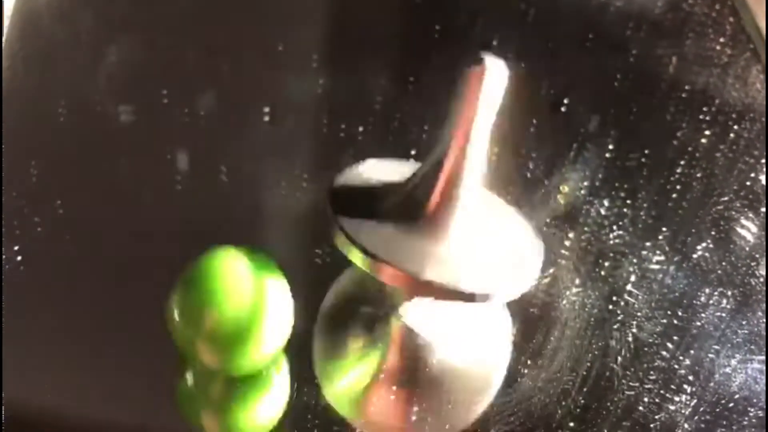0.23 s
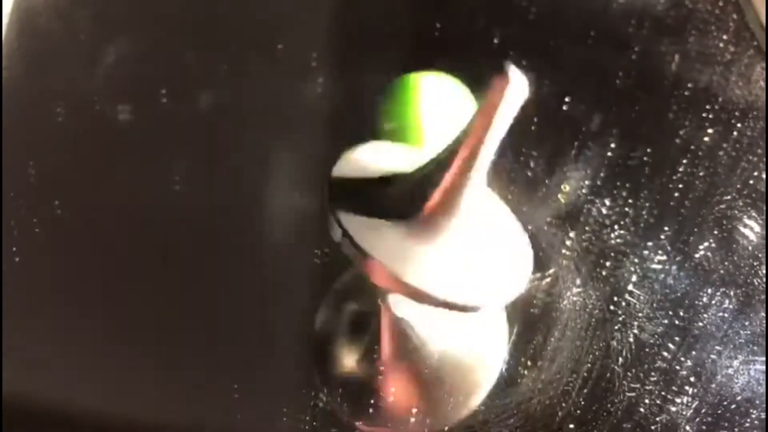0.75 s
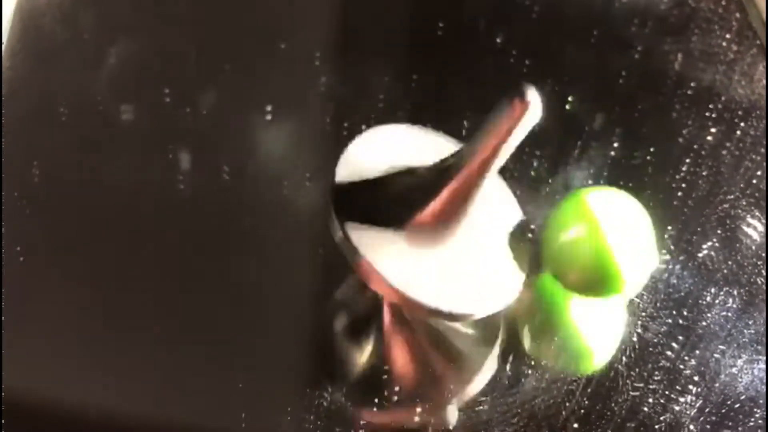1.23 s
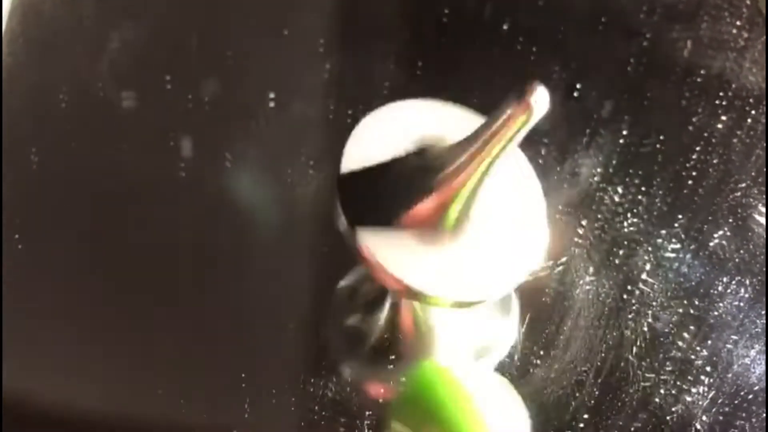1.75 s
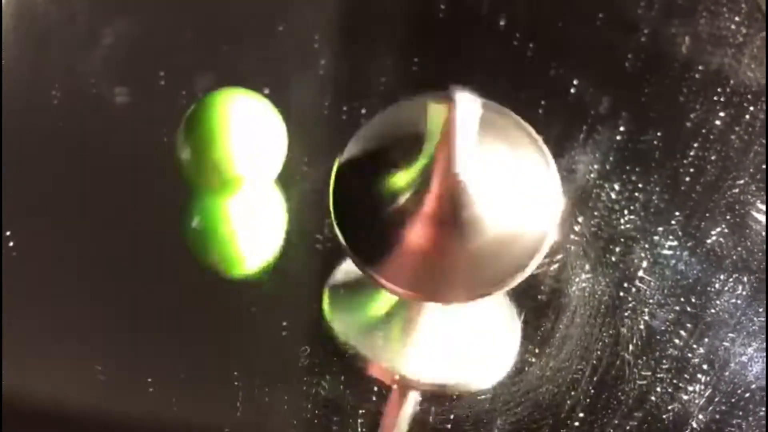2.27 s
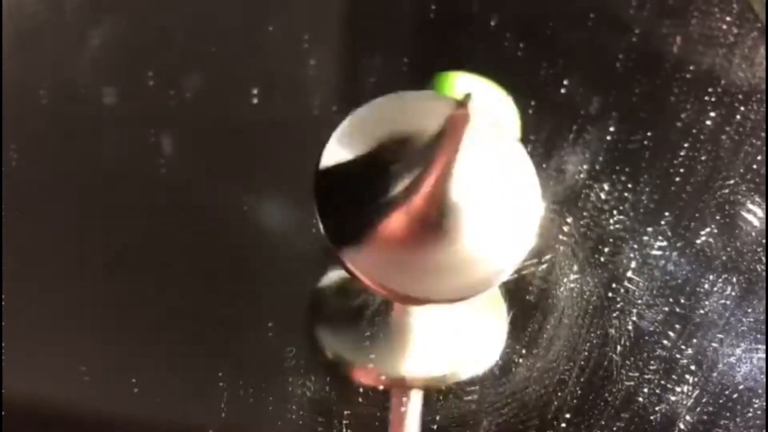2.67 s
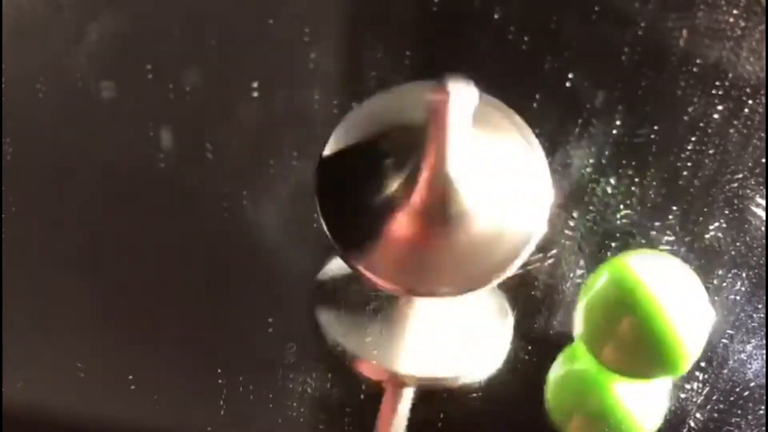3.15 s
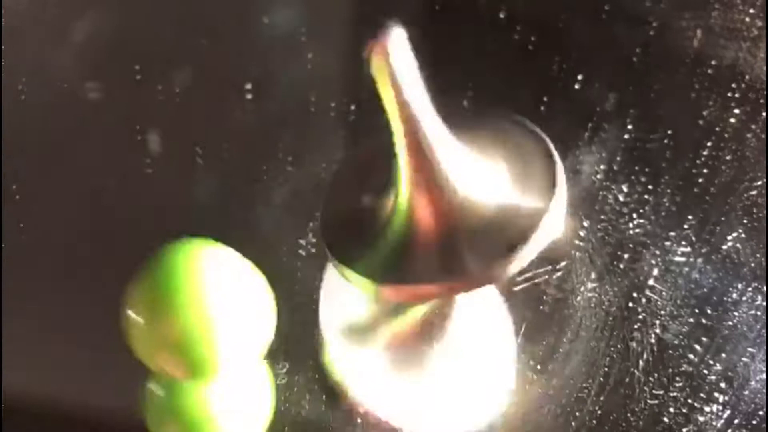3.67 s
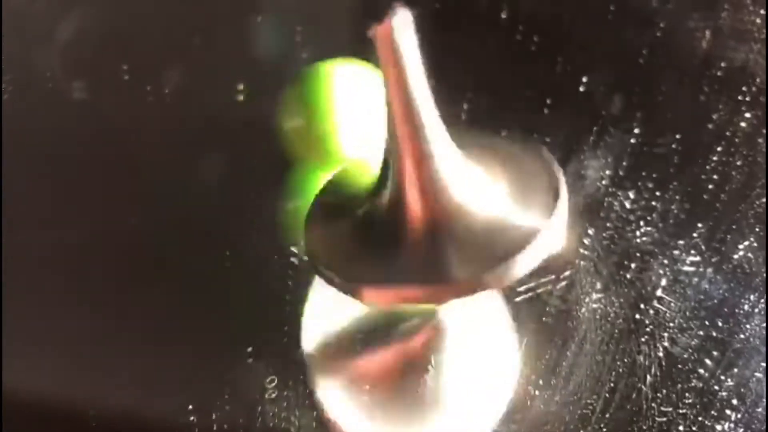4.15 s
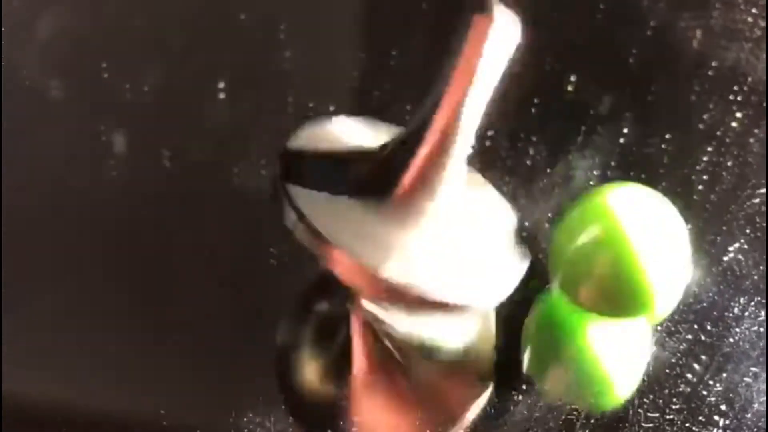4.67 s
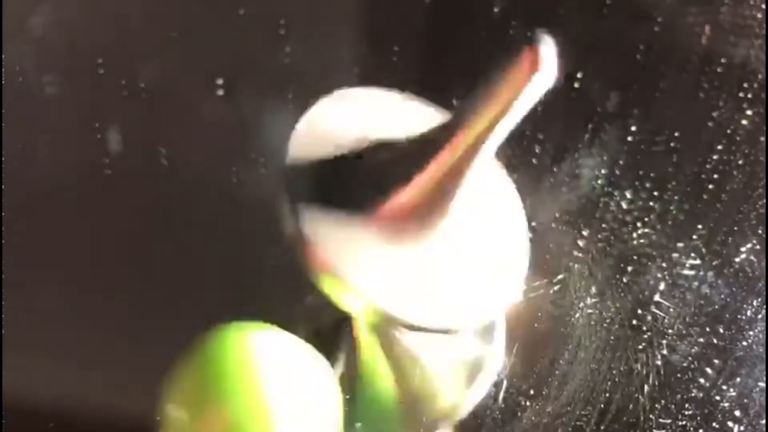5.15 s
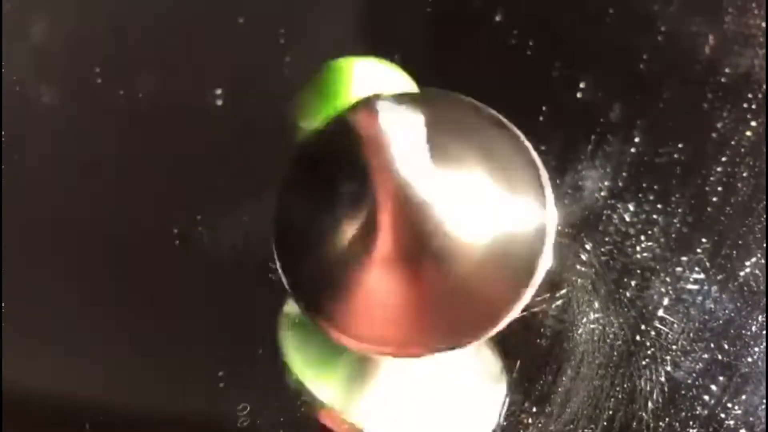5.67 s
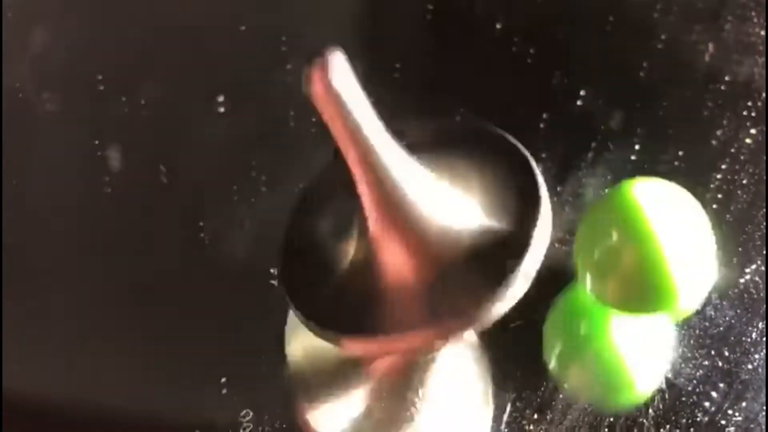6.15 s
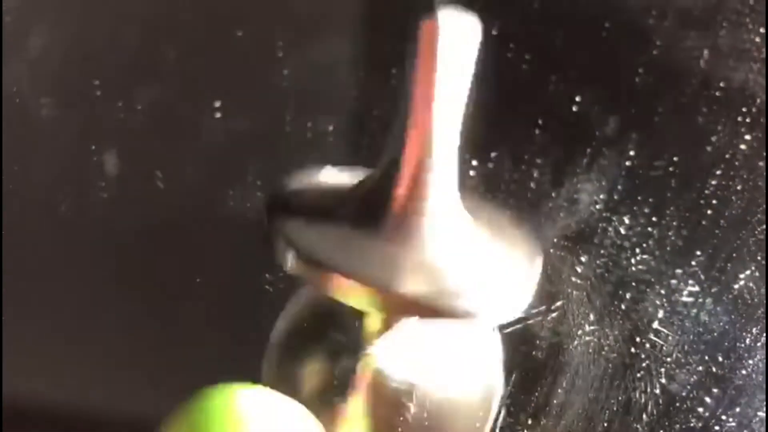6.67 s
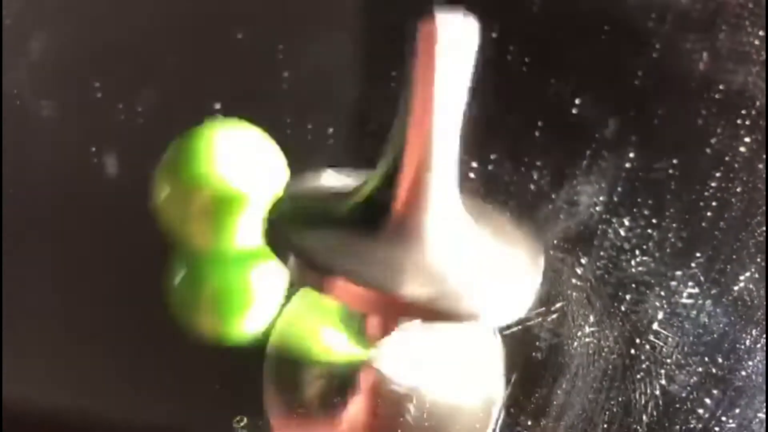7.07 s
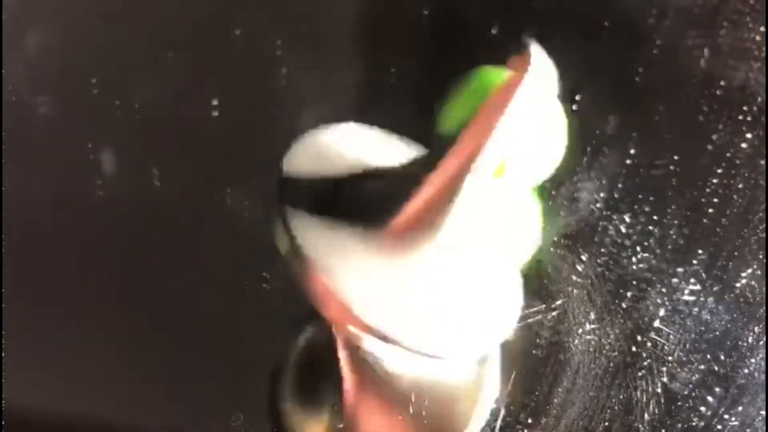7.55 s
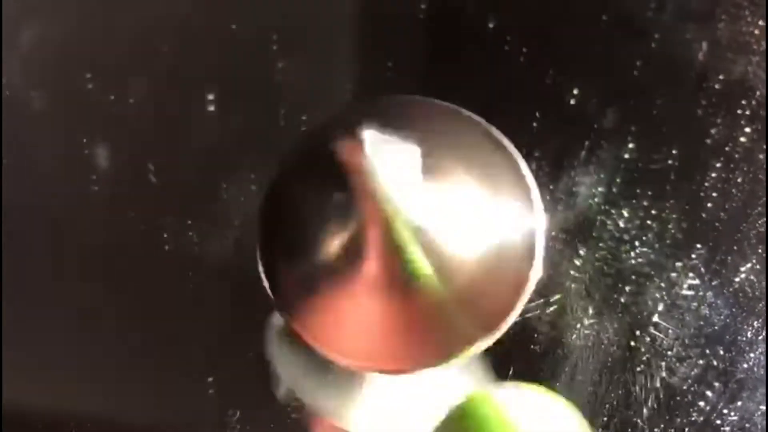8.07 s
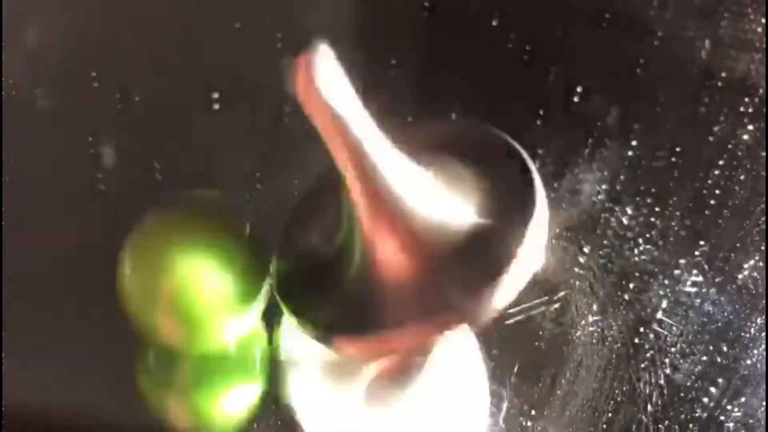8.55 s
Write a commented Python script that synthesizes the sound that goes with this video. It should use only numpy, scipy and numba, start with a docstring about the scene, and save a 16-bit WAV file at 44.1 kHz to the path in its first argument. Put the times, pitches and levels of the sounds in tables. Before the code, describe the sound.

Close, dry sound in a quiet small room: a steel top spins on a mirror with a steady mid-pitched hum and singing tone, fluttering about twenty times a second. A glass marble circles it, rolling, chattering and giving sharp irregular clicks. The pure tone thins midway, and rapid bumps of the leaning tip grow into a hard rattle by the end.

```python
"""A steel top spins on a mirror while a glass marble circles it, heard close up.
From the start the rough tip repeats almost the same pattern every turn, so the mirror hums and sings;
the marble rolls, chatters and clicks on the steel, and three jolts unsettle the pattern by 3.5 s.
Then the pure tone thins out while the top slows and leans further, and its flaw bumps the glass
once a turn, faintly at first and strongest near the end."""
import sys
import numpy as np
from scipy import signal
from scipy.fft import rfft, irfft
from scipy.io import wavfile
from scipy.ndimage import uniform_filter1d, map_coordinates
from numba import njit

SR = 44100
rng = np.random.default_rng(int(sys.argv[2]) if len(sys.argv) > 2 else 0)


def wav_out(sig):
    """Save sig, one row per channel (or a flat mono array), as 16-bit PCM at SR to the path in sys.argv[1]."""
    wavfile.write(sys.argv[1], SR, np.round(np.clip(np.atleast_2d(sig).T, -1, 1) * 32767).astype(np.int16))


N = 388962
TIME = np.arange(N) / SR


def undb(db):
    """Decibels to gain."""
    return 10 ** (np.asarray(db) / 20)


def unit(x):
    """Scale to rms 1."""
    return x / np.sqrt(np.mean(x ** 2))


def curves(table):
    """Draw each column of a table as an automation curve, one value per sample."""
    s, *columns = np.transpose(table)
    return [np.interp(TIME, s, column) for column in columns]


def swell(at_s, width_s):
    """A smooth rise and fall, 1 at its middle."""
    return np.exp(-.5 * ((TIME - at_s) / width_s) ** 2)


def walk(rate):
    """Slow random wander through `rate` knots per second, spread near 1."""
    knots = rng.standard_normal(int(N / SR * rate) + 2)
    return map_coordinates(knots, [TIME * rate], order=3, mode="nearest")


def fade(t, t60):
    """Exponential decay by 60 dB in t60 seconds."""
    return np.exp(-np.log(1000) * t / t60)


def colour(x, points, size=4096):
    """Causal minimum-phase EQ through (Hz, dB) points, scaled to unit power gain on white noise."""
    hz, db = np.transpose(points)
    log_hz = np.log(np.fft.rfftfreq(size, 1 / SR) + 1)
    log_gain = np.log(undb(np.interp(log_hz, np.log(hz), db)))
    # folding the cepstrum forward makes the response causal
    cepstrum = irfft(log_gain)
    cepstrum[1:size // 2] *= 2
    cepstrum[size // 2 + 1:] = 0
    response = irfft(np.exp(rfft(cepstrum)))
    return signal.fftconvolve(x, response / np.linalg.norm(response))[:len(x)]


def resonance(x, hz, width_hz):
    """One resonance, gain 1 at its centre."""
    return signal.lfilter(*signal.iirpeak(hz, hz / width_hz, fs=SR), x)


@njit
def moving_resonance(x, hz, width_hz):
    """State-variable band-pass whose centre may move, gain 1 at the centre."""
    y, band, low = np.empty(len(x)), 0., 0.
    for i in range(len(x)):
        g, k = np.tan(np.pi * hz[i] / SR), width_hz / hz[i]
        v = (band + g * (x[i] - low)) / (1 + g * (g + k))
        band, low, y[i] = 2 * v - band, low + 2 * g * v, k * v
    return y


def grit(per_s, spread_db):
    """Tiny contacts at random moments, a few much harder than the rest."""
    hardness = np.minimum(rng.exponential(size=N), 4)
    contacts = rng.random(N) < per_s / SR
    return unit(contacts * rng.standard_normal(N) * undb(spread_db * hardness))


# colour of the quiet room: (frequency [Hz], relative level [dB])
AIR_COLOUR = [(20, -35), (35, -8), (48, 2), (75, -5.5), (160, -8.5), (400, -11.5), (1000, -5.5),
              (4000, -17.5), (12000, -61)]
AIR_DB = -56.5


def room_tone():
    """Steady coloured noise: the air of the quiet room."""
    return undb(AIR_DB) * colour(rng.standard_normal(N), AIR_COLOUR)


def room(x, wet_db=-17, t60=0.066, size=12000):
    """Faint, dull reflections of a small room: a decaying noise tail after a 12 ms gap."""
    t = np.arange(size) / SR
    tail = colour(rng.standard_normal(size) * fade(t, t60) * (t > .012), [(3000, -12.0), (10000, -11.5)])
    return x + undb(wet_db) * signal.fftconvolve(x, tail / np.linalg.norm(tail))[:N]


# passages of the marble behind the top: (time [s], sag of the ring [Hz])
BEHIND = [(.76, 530), (2.7, 493), (4.25, 314), (5.82, 278), (7.28, 280)]
RING_HZ, BEHIND_WIDTH_S = 3276, 0.3


def ring_hz():
    """Pitch of the marble's ring, sinking each time it passes behind the top."""
    return RING_HZ - sum(sag_hz * swell(s, BEHIND_WIDTH_S) for s, sag_hz in BEHIND)


def glance(x, share=0.11, cycles=4.47):
    """A contact sound minus a near reflection, whose delay follows the pitch of the marble's ring."""
    lag = cycles * SR / ring_hz()
    return x - share * map_coordinates(x, [np.arange(N) - lag], order=3)


# rubs, as the low side of the rim catches the marble: (time [s], level [dB], half length [s])
RUBS = [(0.123, -49.5, 0.23), (0.744, -47.5, 0.29), (1.54, -43.5, 0.18), (1.966, -41, 0.089),
        (2.753, -42, 0.14), (3.33, -43, 0.076), (3.442, -35.5, 0.022), (3.753, -40.5, 0.041),
        (4.272, -40, 0.17), (4.567, -39, 0.056), (4.947, -34, 0.087), (5.202, -37, 0.041),
        (5.774, -39.5, 0.2), (6.23, -38.5, 0.04), (6.402, -32, 0.047), (6.637, -39.5, 0.084),
        (7.144, -40, 0.14), (7.988, -37, 0.31), (8.416, -48, 0.13)]
ROLL_DB = -68


def roll_gain():
    """Strength of the marble's contact: steady rolling plus the rubs of the rim, summed as power."""
    rub_power = sum(undb(db) ** 2 * swell(s, width_s) for s, db, width_s in RUBS)
    return np.sqrt(undb(ROLL_DB) ** 2 + rub_power)


# colour of the marble's rumble: (frequency [Hz], relative level [dB])
RUMBLE = [(1200, -28.5), (2000, 3), (2500, -18), (2750, -5), (3200, 0.5), (3650, 1), (3950, 1),
          (4250, -9.5), (4500, -5), (5300, -10.5), (6300, -14.5), (7600, -18.5), (8500, -21),
          (12000, -28.5)]


def rolling(chatter_db=7, ring_db=10, ring_width_hz=200, skip_db=3.5, skip_size=400,
            chatter_hz=3400, chatter_width_hz=2200):
    """The marble grinds along the glass and chatters softly on the spinning rim, its contact wavering by a few
    dB."""
    skip = uniform_filter1d(rng.standard_normal(N), size=skip_size)
    skip = unit(uniform_filter1d(skip, size=skip_size))
    chatter = unit(resonance(colour(grit(600, 2.35), RUMBLE), chatter_hz, chatter_width_hz))
    grind = colour(grit(3000, 1.0), RUMBLE)
    contacts = glance(undb(skip_db * skip) * (grind + undb(chatter_db) * chatter))
    sound = contacts + undb(ring_db) * moving_resonance(contacts, ring_hz(), float(ring_width_hz))
    # level the rolling by its own running loudness, so that roll_gain sets its strength
    return sound / np.sqrt(uniform_filter1d(sound ** 2, size=4400))


# ring of marble, steel and glass at a contact: (frequency [Hz], relative level [dB], t60 [s])
CLACK_MODES = [(1123, -17.5, 0.08), (2050, -17.5, 0.025), (2427, -6, 0.019), (2650, -21, 0.018),
               (3040, -3, 0.022), (3248, -4, 0.011), (4006, -11.5, 0.025), (4620, -15.5, 0.018),
               (5360, -16, 0.0025), (5770, -15, 0.0052), (7180, -17.5, 0.0071), (8330, -33, 0.014),
               (8900, -22, 0.01), (10570, -23.5, 0.0049)]
# colour of the crack: (frequency [Hz], relative level [dB])
CRACK = [(60, -59), (300, -41), (1400, -12.5), (2000, 4), (2800, 6.5), (3500, 10.5), (5200, 2), (7000, -7),
         (9000, -17), (10800, -19.5), (12000, -30)]
# hard knocks of the marble, with a few of the top's bumps among them;
# level before the fader, thud is halved and brightness scaled in the mix:
# (time [s], click peak [dB], mirror thud [dB], brightness [dB])
KNOCKS = [(.0549, -16, -3, -27), (.0825, -16.5, -8, -20), (.683, -17, -14, -19), (.9432, -12, -22, -17.5),
          (1.2479, -22.5, -10, -19), (1.3712, -14, -20, -22), (1.3792, -4.5, 6, -10), (1.459, -20, -5, -21),
          (2.0017, -1.5, -6.5, -12), (2.0544, -22, -13, -23), (2.1076, -19.5, -21, -17),
          (2.166, -20.5, -12, -12), (2.5664, -12, -12, -25), (2.676, -12, -7, -12), (2.7165, -11.5, 4, -12),
          (2.777, -10, -6, -16), (2.7919, -14.5, -8, -42), (2.8955, -18.5, -15, -17),
          (2.9274, -14.5, -10, -35), (3.2028, -16, -3, -34), (3.2865, -13.5, -27, -27),
          (3.3413, -13.5, 1, -20), (3.4595, -17, -8, -32), (3.5245, 2.5, -26, -16), (3.5672, -14, -13, -24),
          (3.6538, -10, -21, -19), (3.7164, -18.5, -9, -18), (3.826, -24, -6, -16), (3.966, -16, -14, -12),
          (4.0746, -9, -13, -19.5), (4.1761, -10, 2, -19), (4.2745, -16, 10, -21), (4.3886, -17, -24, -30),
          (4.5661, -11.5, -19, -13), (4.637, -14, 11, -30), (4.7584, -19.5, -7, -19),
          (4.797, -17, -10, -25), (4.8955, -26, -12, -38), (4.9197, -12.5, -26, -27),
          (4.9633, -19, -12, -35), (5.0118, -18.5, -9, -41), (5.3582, -18.5, -4, -18),
          (5.386, -23, -10, -11), (5.8042, -3.5, -10, -19.5), (5.8257, -19, 18, -44),
          (5.8656, -19, -15, -29), (5.917, -18, -7, -27), (5.9573, -16, 11, -38), (5.9937, -12, -13, -35),
          (6.283, -17, -8, -35), (6.36, -26, -9, -38), (6.3741, -10.5, -7, -24), (6.3985, -16, -5, -22),
          (6.412, -11, 3, -16), (6.4677, -23, -10, -21), (6.5791, -13.5, -6, -37), (6.683, -18, -5, -40),
          (6.9684, -22, -12, -4), (7.0976, -14, -2, -16), (7.312, -15.5, -1, -23), (7.423, -13, -3, -24),
          (7.6027, -11, -19, -35), (7.8071, -17, 8, -27), (7.826, -21, -8, -22), (8.0161, -14, -4, -28),
          (8.109, -22, -10, -34), (8.215, -20, -8, -39), (8.4321, -14, -13, -27), (8.4511, -12.5, -11, -25),
          (8.4622, -15, -6, -29), (8.8093, -8, -18, -14)]
USUAL_BRIGHT_DB = -25.5  # brightness that leaves the top of the click EQ at 0 dB
TAIL_T60_S = .11


def knocks(rows, crack_db=-7, crack_t60=0.014, tail_db=-23, thud_db=-10, thud_lag_s=0.000953, detune=0.017,
           weight_db=2, orbit_db=-4, orbit_t60=0.024, bright=0.63, size=4096):
    """Hard contacts: a short crack with a faint tail, ringing modes and a later thud from the mirror."""
    out, t = np.zeros(N + size), np.arange(size) / SR
    hz, db, t60 = np.transpose(CLACK_MODES)[:, :, None]
    push = np.interp(t - thud_lag_s, [-1 / SR, 0, 1 / SR], [0, 1, 0])
    thud = colour(push, MIRROR)
    thud = thud / np.abs(thud).max()
    crack_shape = fade(t, crack_t60) + undb(tail_db) * fade(t, TAIL_T60_S)
    orbit_hz = ring_hz()
    for s, peak_db, mirror_db, bright_db in rows:
        start = int(s * SR)
        # every contact point detunes and weights the modes differently
        pitch, weight = rng.standard_normal((2, len(hz), 1))
        strength = undb(db + weight_db * weight) * np.sign(weight)
        ring = np.sum(strength * fade(t, t60) * np.sin(2 * np.pi * hz * (1 + detune * pitch) * t), axis=0)
        # one ring follows the marble's orbit
        ring = ring + undb(orbit_db) * fade(t, orbit_t60) * np.sin(2 * np.pi * orbit_hz[start] * t)
        crack = colour(rng.standard_normal(size) * crack_shape, CRACK)
        treble_db = bright * (bright_db - USUAL_BRIGHT_DB)
        click = colour(ring + undb(crack_db) * crack,
                       [(150, -12.0), (1200, 0.5), (3500, 2.5), (7500, treble_db)])
        sound = click / np.abs(click).max() + undb(thud_db + .5 * mirror_db) * thud
        out[start:start + size] += undb(peak_db) * sound
    return glance(out[:N])


# the axis swings round a cone, a little faster as the spin falls
SWAY_HZ, SWAY_RISE_HZ_PER_S, SWAY_AT_S = 2.2, .035, .07


def sway():
    """Swing of the axis round its cone, -1 to 1."""
    swing_hz = SWAY_HZ + .5 * SWAY_RISE_HZ_PER_S * TIME
    return np.cos(2 * np.pi * swing_hz * (TIME - SWAY_AT_S))


# the slowing top: (time [s], speed before jolts and sway [turns/s])
SPIN = [(0, 21.81), (3.5, 20.93), (5.4, 20.41), (6.3, 20.255), (8.82, 19.625)]
# jolts off its track, timed with hard knocks; the last costs no speed: (time [s], speed lost [turns/s])
JOLTS = [(1.379, .16), (2.002, .079), (3.524, 0)]
SWAY_SPIN_SHARE = .0013  # share of the spin


def spin():
    """Turns per second: the top slows at a varying rate, two of the jolts take a little more, the sway wavers it."""
    lost = sum(loss * (TIME > s) for s, loss in JOLTS)
    return (curves(SPIN)[0] - lost) * (1 + SWAY_SPIN_SHARE * sway())


# recovery from each jolt in turn: (settling time [s], level change as the tip is unloaded [dB])
RECOVERY = [(0.22, 1), (0.19, -5.5), (1.5, 0)]
DIP_AFTER_S, DIP_WIDTH_S = 0.095, 0.032
# likeness of one turn to the next (0-1)
SETTLED_LIKENESS, JOLTED_LIKENESS = .95, .1


def settling():
    """How closely the tip retraces its track, and its level change in dB: each jolt unsettles it for a while."""
    likeness, dip_db = np.full(N, SETTLED_LIKENESS), 0
    for (s, _), (settle_s, depth_db) in zip(JOLTS, RECOVERY):
        upset = np.exp(-np.maximum(TIME - s, 0) / settle_s)
        recovering = SETTLED_LIKENESS + (JOLTED_LIKENESS - SETTLED_LIKENESS) * upset
        likeness = np.where(TIME > s, recovering, likeness)
        dip_db = dip_db + depth_db * swell(s + DIP_AFTER_S, DIP_WIDTH_S)
    return np.clip(likeness, 0, 1), dip_db


def per_turn(turns):
    """A random value that holds for one whole turn."""
    turn = (np.round(turns) - np.round(turns[0])).astype(int)
    return rng.standard_normal(turn[-1] + 1)[turn]


def tip_track(turns, likeness, size=2048):
    """Roughness under the tip: a pattern round one turn, partly renewed on each turn."""
    turns = turns - np.floor(turns[0])
    rows = rng.standard_normal((int(turns[-1]) + 2, size))
    keep = np.clip(np.interp(np.arange(len(rows)), turns, likeness), 0, 1)
    for k in range(1, len(rows)):
        rows[k] = keep[k] * rows[k - 1] + np.sqrt(1 - keep[k] ** 2) * rows[k]
    return unit(map_coordinates(rows.ravel(), [turns * size], order=3))


def load_shift():
    """Shift of the load on the tip, from 0 upright to 1 leaning."""
    return np.interp(TIME, [3, 6.3], [0, 1])


def thumps(turns, place, hz=1015, width_hz=290, lead=0.03492):
    """One push at a fixed place in every turn, rung by three resonances of the glass; peak 1."""
    count = np.floor(turns - place + lead)
    push = np.diff(count, prepend=count[0])
    ring = resonance(resonance(resonance(push, hz, width_hz), hz, width_hz), hz, 2 * width_hz)
    return ring / np.abs(ring).max()


# facets of the tip, each pushing the glass once a turn:
# (place in the turn [0-1], level upright [dB], level leaning [dB])
FACETS = [(.88, 0, -1.5), (.41, 0, -13.5), (.66, -9, -7), (.32, -7, -6), (.15, -23, -7.5),
          (0.98, -7.5, -24)]


def facets(turns, upright_hz=935, upright_width_hz=220, upright_level_db=-4):
    """The tip rolls over its facets: upright they stir a low mode, leaning shifts the load and widens the ring."""
    leaning = load_shift()
    upright = sum(undb(db + upright_level_db) * thumps(turns, place, upright_hz, upright_width_hz)
                  for place, db, _ in FACETS)
    tilted = sum(undb(db) * thumps(turns, place) for place, _, db in FACETS)
    return np.sqrt(1 - leaning) * upright + np.sqrt(leaning) * tilted


def pressure(turns, width, between_db):
    """Load on the glass through the turn: it peaks as each facet rolls under."""
    leaning, load = load_shift(), undb(between_db)
    for place, upright_db, tilted_db in FACETS:
        gain = undb(upright_db + (tilted_db - upright_db) * leaning)
        off = (turns - place + .5) % 1 - .5
        load = load + gain * np.exp(-.5 * (off / width) ** 2)
    return load


# the mirror answers a push only inside its band of strong modes
PLATE_LOW_HZ, PLATE_HIGH_HZ = 860, 1310


def plate(x):
    """Keep the band in which the mirror rings."""
    band = signal.butter(3, [PLATE_LOW_HZ, PLATE_HIGH_HZ], "bandpass", fs=SR, output="sos")
    return signal.sosfilt(band, x)


# multiples of the spin on which two modes of the mirror sing, stepping at set times:
# (from time [s], high mode [x spin], low mode [x spin])
LOCK = [(0, 53, 19), (1.38, 53, 26), (2.0, 54, 26), (3.53, 55, 20), (3.9, 56, 20)]


def locked_line(axis):
    """A sine on the multiple of the spin given by one column of LOCK."""
    table = np.transpose(LOCK)
    multiple = table[axis][np.searchsorted(table[0], TIME, side="right") - 1]
    return np.sin(2 * np.pi * np.cumsum(multiple * spin()) / SR)


def undertone(level_db=-63):
    """A faint low mode of the mirror under the hum."""
    return undb(level_db) * locked_line(axis=2)


# the grinding tip stirs the singing mode, most when the sway presses it down
HALO_HZ, HALO_WIDTH_HZ, HALO_DB = 1144, 63, -11
SING_BETWEEN_DB = -3  # load left between facets


def sing(turns, lead=-.01, swing_db=5):
    """The high ring of the mirror: one tone in a rough halo, swelling under each facet."""
    load = unit(pressure(turns + lead, width=.07, between_db=SING_BETWEEN_DB))
    halo = resonance(rng.standard_normal(N), HALO_HZ, HALO_WIDTH_HZ)
    halo = resonance(halo, HALO_HZ, HALO_WIDTH_HZ)
    halo = unit(halo * undb(swing_db * sway()))
    return unit(load * (locked_line(axis=1) + undb(HALO_DB) * halo))


# colour of the mirror's hum: (frequency [Hz], relative level [dB])
MIRROR = [(30, -75), (150, -44.5), (420, -32), (700, -34.5), (810, -26.5), (885, -2), (980, 1), (1060, 1),
          (1140, 2.5), (1235, -2.5), (1300, -10.5), (1390, -35), (1700, -20.5), (3000, -66.5)]
# low flexing of the glass: (frequency [Hz], relative level [dB])
DRONE = [(60, -22.5), (260, -6.5), (330, -12), (410, -3), (480, -6.5), (540, -5), (620, -4), (700, -4),
         (800, -9), (1000, -3), (2000, -60.5)]
DRONE_LIKENESS = .96


def hum(turns, likeness, lead=0.071, drone_db=-20, upper_hz=1235, upper_width_hz=70, upper_db=-1):
    """The rough tip shakes the mirror, hardest under each facet."""
    load = pressure(turns + lead, width=0.038, between_db=-4.5)
    glass = colour(tip_track(turns, likeness) * load, MIRROR)
    # once knocked off its spot, the top also stirs a higher mode of the glass
    stirred = undb(upper_db) * np.interp(TIME, [3.5, 4.3], [0, 1])
    glass = glass + stirred * resonance(glass, upper_hz, upper_width_hz)
    # level the hum by its own running loudness
    glass = glass / np.sqrt(uniform_filter1d(glass ** 2, size=4200))
    # the coarse shape of the tip lasts longer than its fine track
    drone = colour(tip_track(turns, np.full(N, DRONE_LIKENESS)), DRONE)
    return glass + undb(drone_db) * drone


# colour of the tip's scrape: (frequency [Hz], relative level [dB])
SCRAPE = [(900, -36.5), (1500, -15.5), (2050, 2.5), (2300, 1), (2420, 4.5), (2600, 4.5), (2800, -5.5),
          (3170, -7), (3500, -9.5), (4200, -5), (4480, 0.5), (4900, -10), (6000, -19), (7400, -29),
          (9000, -25), (12000, -35.5)]
# thin whines that drift and come and go: (centre [Hz], width [Hz], drift [Hz], mean level [dB])
WHINES = [(2299, 51, 31, 1), (2520, 200, 70, 0)]
WHINE_FADE_DB = 2
SYMPATHY_DB, SYMPATHY_WIDTH_HZ = 8, 200


def scrape(turns, likeness, grit_db=-3):
    """Fine scratching of steel on glass, sharpest on the facets; the marble rings along at its orbit's pitch."""
    load = pressure(turns, width=0.034, between_db=-7)
    scratch = tip_track(turns, 0.92 * likeness) + undb(grit_db) * grit(1200, 10.5)
    scratch = colour(load * scratch, SCRAPE)
    whine = 0
    for hz, width_hz, drift_hz, db in WHINES:
        gain = undb(db + WHINE_FADE_DB * walk(3.015))
        whine = whine + gain * moving_resonance(scratch, hz + drift_hz * walk(3), float(width_hz))
    sympathy = undb(SYMPATHY_DB) * moving_resonance(scratch, ring_hz(), float(SYMPATHY_WIDTH_HZ))
    return unit(scratch + whine + sympathy)


# how far the top leans onto the flaw of its tip: (time [s], lean [about 0-1])
LEAN = [(0, 0.25), (4.2, 0.48), (5.7, 0.63), (6.05, 0.84), (6.22, 0.65), (6.53, 0.88), (7.2, 0.83),
        (7.38, 0.89), (7.5, 0.76), (7.93, 0.97), (8.07, 0.84), (8.16, 0.96), (8.3, 0.94), (8.39, 0.84),
        (8.5, 1), (8.57, 1.03), (8.72, 0.94), (8.82, 0.99)]
# the leaning top nods, which presses the flaw harder and softer in turn
NOD_HZ, NOD_AT_S, NOD_DB = 3.9, 7.08, 1


def leaning_db(ends_db):
    """Level of the bump: between its upright and its full-lean value, rising and falling with the nod."""
    nod = np.cos(2 * np.pi * NOD_HZ * (TIME - NOD_AT_S))
    return ends_db[0] + (ends_db[1] - ends_db[0]) * curves(LEAN)[0] + NOD_DB * nod


STRIKE_SCATTER_DB = 3.5


def strike(turns, modes, place=-.002):
    """The flaw makes steel and glass ring, with a slightly different colour on every turn."""
    return sum(undb(db + STRIKE_SCATTER_DB * per_turn(turns)) * thumps(turns, place, hz, width_hz)
               for hz, width_hz, db in modes)


# colour of the rasp: (frequency [Hz], relative level [dB])
RASP = [(40, -37), (150, -17), (330, -13), (480, -11), (700, -15), (950, -20.5), (1200, 15), (1420, -16),
        (2000, 0), (2450, 0.5), (2800, -22.5), (3300, -2.5), (4100, -7), (4500, -5), (5000, -13.5),
        (7500, -30), (9000, -30), (12000, -37)]
# modes of the mirror in the thump: (centre [Hz], filter width [Hz], relative level [dB])
THUMP_MODES = [(953, 238, -4.5), (1170, 240, -3)]
# what the flaw rings with in the clack: (centre [Hz], filter width [Hz], relative level [dB])
STRIKE_MODES = [(370, 60, -44), (474, 54, -45), (560, 550, -24), (2017, 420, -10), (2410, 420, -6.5),
                (3243, 305, -5.5), (3550, 390, -6.5), (3960, 290, -17), (4390, 630, -19), (5240, 270, -25),
                (5200, 2800, -11)]
# faders of the bump, growing with the lean: (dB upright, dB at full lean)
THUMP_DB, RASP_DB, CLACK_DB = (-41.5, -18.5), (-64, -28.5), (-75.5, -16.5)
THUMP_SCATTER_DB, BUMP_JITTER_TURNS = 1, .01


def bumps(turns, width=0.033, skirt=0.17, skirt_db=-9, early=0.0021):
    """A flaw on the side of the tip strikes the glass once a turn: rasp, clack and thump together."""
    # each bump lands a little early or late
    landing = turns + BUMP_JITTER_TURNS * per_turn(turns)
    off = (landing + early + .5) % 1 - .5
    contact = np.exp(-.5 * (off / width) ** 2) + undb(skirt_db) * np.exp(-.5 * (off / skirt) ** 2)
    rasp = undb(leaning_db(RASP_DB)) * colour(contact * tip_track(turns, np.full(N, .7)), RASP)
    thump_gain = undb(leaning_db(THUMP_DB) + THUMP_SCATTER_DB * per_turn(turns))
    thump = thump_gain * plate(strike(landing, THUMP_MODES, place=-.015))
    clack = undb(leaning_db(CLACK_DB)) * strike(landing, STRIKE_MODES)
    return rasp + clack + thump


# tip on the glass, before sway and jolts: (time [s], hum level [dB], scrape level [dB])
TIP = [(0, -35, -41.5), (1.0, -34, -43.5), (1.8, -35.5, -45), (2.3, -37, -45), (2.7, -37.5, -44.5),
       (3.4, -36.5, -46), (5.2, -36, -47), (6.3, -36, -47.5), (6.9, -34.5, -44), (8.0, -35, -50.5),
       (8.8, -36, -43)]
# pure tone in the hum, high while the top runs true: (time [s], share of power [0-1])
PURITY = [(0, 0.72), (1.9, 0.6), (3.4, 0.54), (4.4, 0.1), (5.5, 0.15)]
SWAY_HUM_DB, SWAY_SCRAPE_DB = 0.53, 0.8


def spinning_top(turns):
    """The steel top on the glass: hum, song and facets, scrape, once-a-turn bumps and undertone."""
    likeness, dip_db = settling()
    hum_db, scrape_db = curves(TIP)
    pure = np.clip(curves(PURITY)[0], 0, 1)
    glass = np.sqrt(1 - pure) * hum(turns, likeness) + np.sqrt(pure) * sing(turns)
    glass = glass + undb(7.5) * plate(facets(turns))
    tip = undb(hum_db + SWAY_HUM_DB * sway()) * glass
    tip = tip + undb(scrape_db + SWAY_SCRAPE_DB * sway()) * scrape(turns, likeness)
    return undb(dip_db) * tip + bumps(turns) + undertone()


BUMP_AT_S = 7.027  # the turn count is zero here, which sets the phase of the bumps


def scene():
    """Top and marble on the mirror in a quiet room."""
    turns = np.cumsum(spin()) / SR
    turns = turns - np.interp(BUMP_AT_S, TIME, turns)
    top = spinning_top(turns)
    marble = roll_gain() * rolling()
    clicks = undb(-4.0) * knocks(KNOCKS)
    return (room(top + marble + clicks) + room_tone())[None]


TOP_HZ = 11700


def record(dry):
    """A steep low-pass takes away the treble above TOP_HZ."""
    return signal.sosfilt(signal.ellip(8, .2, 60, TOP_HZ, fs=SR, output="sos"), dry)


dry = scene()
out = record(dry)
wav_out(out)
```